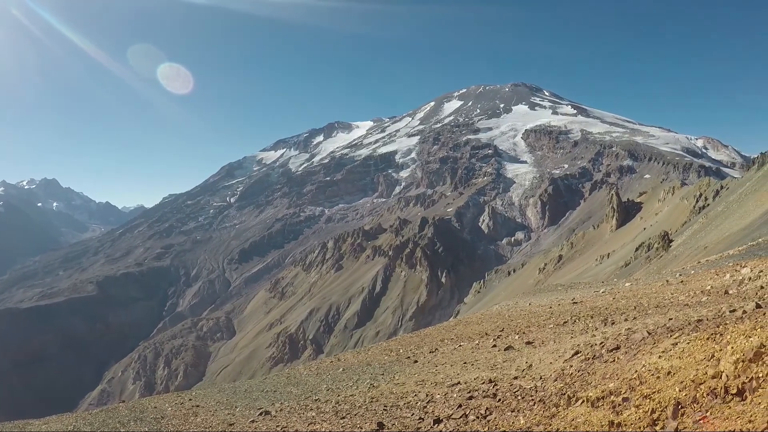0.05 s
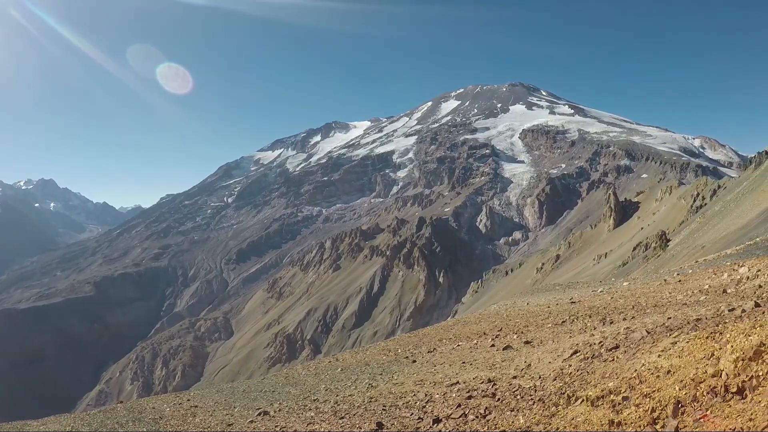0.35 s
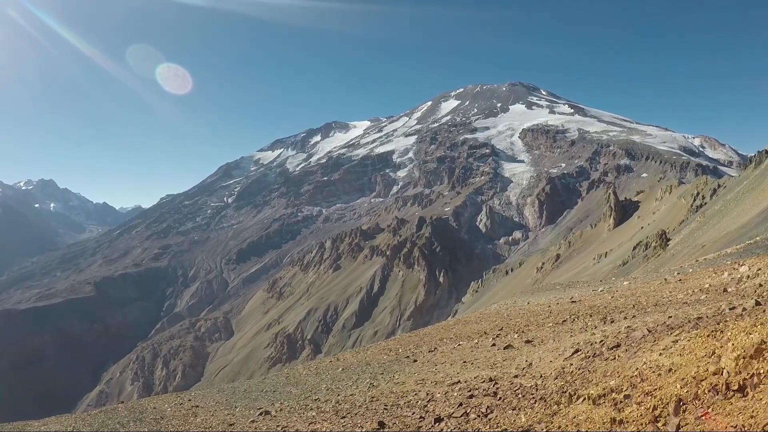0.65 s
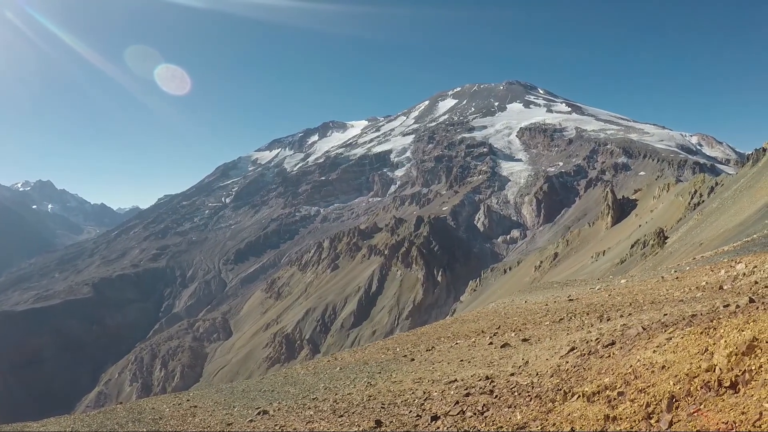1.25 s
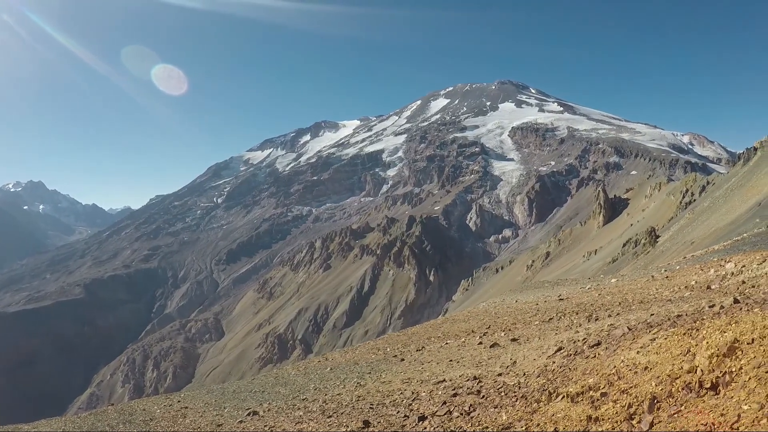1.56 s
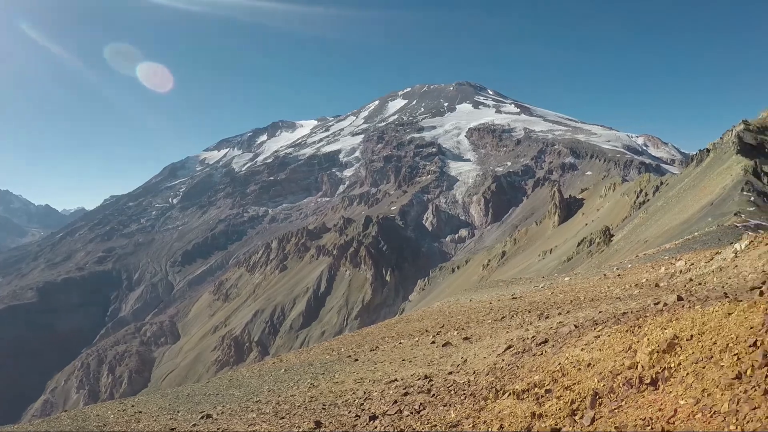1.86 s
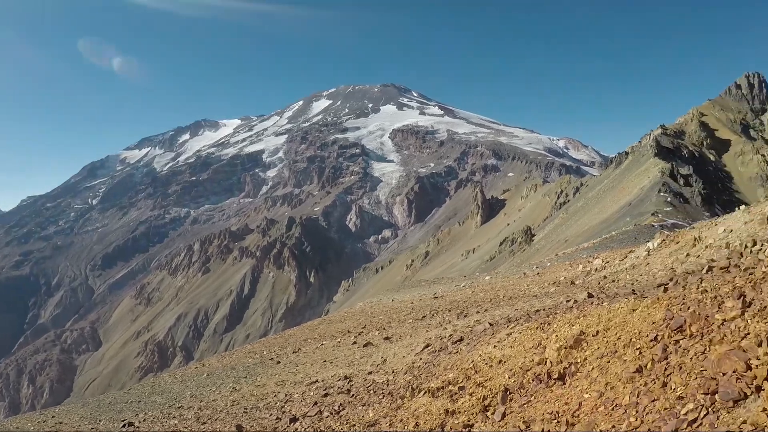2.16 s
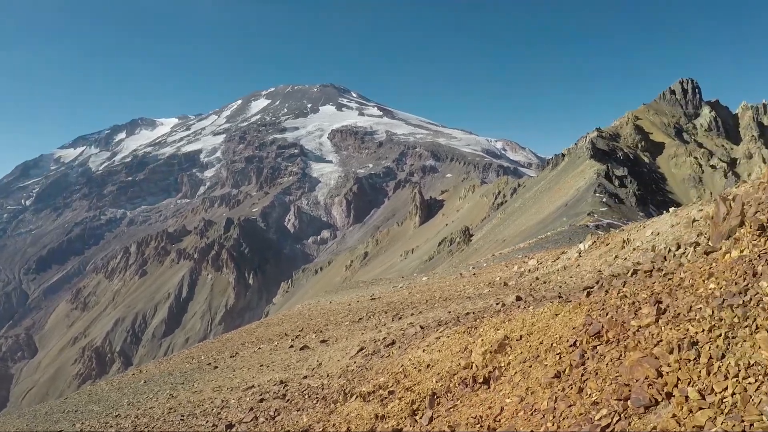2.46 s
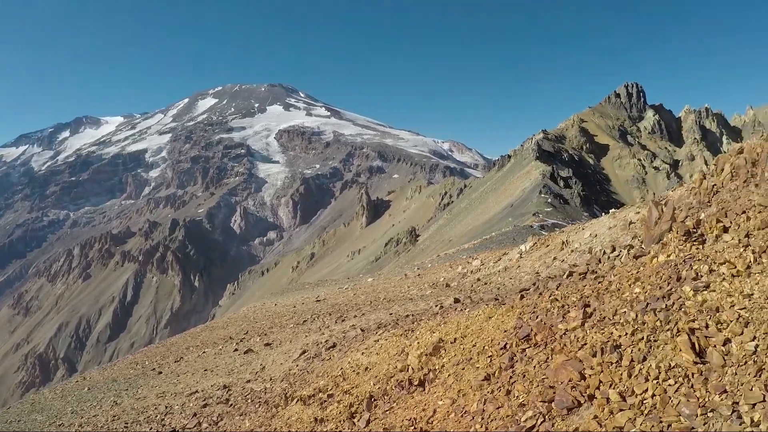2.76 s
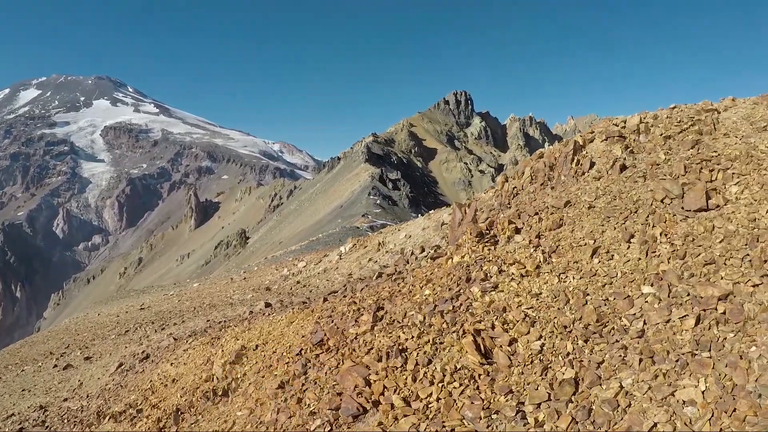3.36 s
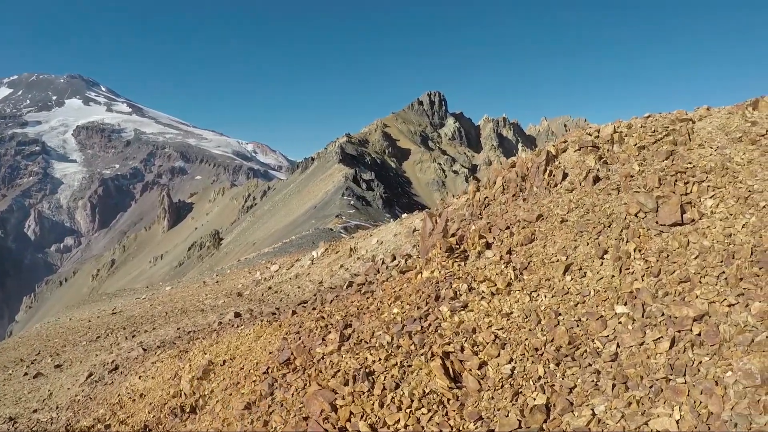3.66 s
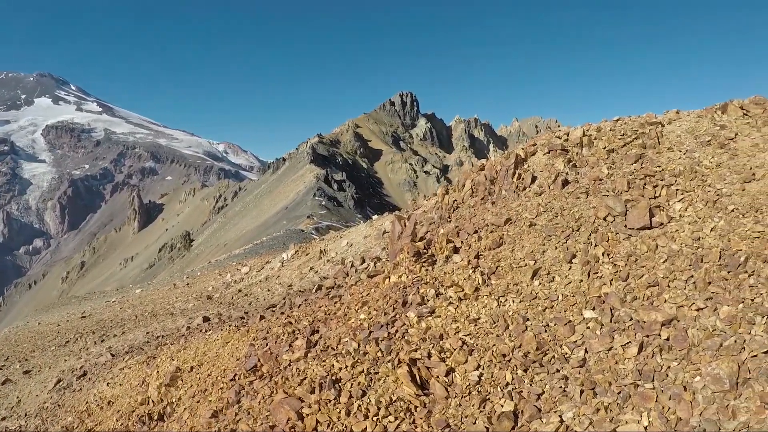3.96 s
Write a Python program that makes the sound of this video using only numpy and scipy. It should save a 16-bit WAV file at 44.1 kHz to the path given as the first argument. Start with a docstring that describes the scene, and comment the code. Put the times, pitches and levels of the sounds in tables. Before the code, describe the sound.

Wind rumbles and buffets against a small microphone on a rocky mountain slope, then eases. A few loose stones click faintly, and near the end a boot shifts with two soft crunches in the gravel.

```python
"""Wind on a scree slope

Wind buffets a small camera's microphone, then eases: eddies at the port rumble and rush.
Loose stones click and ring underfoot; near the end a boot shifts and crunches twice in the gravel,
each push a shower of small contacts. A very faint thin whine and the microphone's hiss lie underneath."""
import sys
import numpy as np
from scipy.fft import rfft, irfft, next_fast_len
from scipy.io import wavfile
from scipy.ndimage import uniform_filter1d, minimum_filter1d, map_coordinates

SR = 44100
rng = np.random.default_rng(int(sys.argv[2]) if len(sys.argv) > 2 else 0)


def wrap_up_sound(samples):
    """Save the sound to the file named by the first command line argument, as 16-bit audio."""
    columns = np.atleast_2d(samples).T
    # keep every value between -1 and 1, then stretch to whole-number steps
    tamed = np.clip(columns, -1, 1)
    steps = np.round(tamed * 32767).astype(np.int16)
    wavfile.write(sys.argv[1], SR, steps)


N = 176400

# Wind spectra, low to high; the port notches the rush (frequency [Hz], relative level [dB])
BUFFET_SPECTRUM = [(8, -8), (22, 3.5), (45, 2), (80, -6.5), (130, -16.5), (550, -120)]
RUMBLE_SPECTRUM = [(40, -14.5), (90, 1.5), (130, 1.5), (200, -3.5), (300, -19), (550, -45), (2000, -120)]
ROAR_SPECTRUM = [(110, -29), (205, 2.5), (350, -6), (480, -22.5), (640, -120)]
RUSH_SPECTRUM = [(300, -1), (480, 5), (560, -7), (660, 0.5), (800, 1.5), (950, -5.5), (1140, -20.5),
                 (1310, -8.5), (1750, -13), (2250, -24.5), (14000, -105)]
# Wind between gusts (time [s], buffet [dB], rumble [dB])
BREEZE_LEVELS = [(0, -20.5, -23.5), (.75, -14.5, -21.5), (1.4, -19, -25.5), (1.72, -26, -24.5),
                 (1.97, -16.5, -30.5), (2.21, -24.5, -38.5), (2.29, -18.5, -30), (2.65, -21.5, -30.5),
                 (2.87, -32.5, -48.5), (3.15, -23, -42.5), (3.32, -32.5, -47.5), (3.7, -21, -34.5),
                 (3.84, -28.5, -49)]
# Gusts at the port (start [s], length [s], buffet [dB], rumble [dB], rush [dB])
GUST_EVENTS = [(0.124, 0.068, -20.5, -17.5, -39.5), (0.186, 0.15, -15, -18, -37.5),
               (0.457, .135, -21, -21, -44), (0.822, 0.081, -16, -20, -51),
               (0.908, .045, -13.5, -13.5, -40.5), (1.089, .17, -25, -22, -50),
               (1.329, 0.071, -21, -21, -45.5), (1.483, 0.099, -12, -20.5, -47),
               (1.493, 0.03, -33, -28, -35.5), (1.768, 0.08, -37, -22.5, -51),
               (1.833, .08, -13, -25.5, -61), (2.04, 0.072, -16, -19.5, -51.5),
               (2.132, 0.036, -10, -26, -51.5), (3.39, 0.091, -14.5, -33.5, -64),
               (3.481, .12, -15.5, -26, -58), (3.865, 0.087, -15.5, -28, -64)]
# Gravel giving way (start [s], level [dB], decay [s], tilt [dB/octave])
CRUNCH_EVENTS = [ (1.512, -55, 0.037, 5), (2.037, -42.5, 0.016, 0.5), (3.126, -46, 0.014, 2),
                 (3.146, -49, 0.038, 4.5), (3.213, -54.5, 0.045, 2), (3.308, -37, 0.011, 0),
                 (3.321, -46.5, 0.03, 3), (3.339, -42.5, 0.028, 3), (3.357, -45.5, 0.012, 2.5),
                 (3.389, -44.5, 0.033, -1.5), (3.731, -52.5, 0.01, 0), (3.827, -54, 0.023, -0.5),
                 (3.953, -42, 0.0086, -2.5)]
# Gravel contacts (frequency [Hz], relative level [dB])
GRAVEL_SPECTRUM = [(450, -9.5), (850, -2.5), (1120, -6), (1520, -1.5), (3300, -5), (5400, -7), (9200, -6.5),
                   (10500, -21.5), (15000, -37)]
# Resonances of the larger stones (frequency [Hz])
STONE_MODES_HZ = [1534, 3200]
# Single stones knocking (start [s], level [dB], ring [Hz], decay [s])
CLICK_EVENTS = [ (0.275, -38.5, 7800, 0.0034), (.292, -49, 8600, 0.011), (1.2763, -35, 6700, 0.0012),
                (1.48, -51, 3550, 0.0075), (2.039, -39.5, 2880, 0.0051), (2.227, -39.5, 2040, 0.0045),
                (3.129, -33.5, 6320, 0.0085), (3.17, -37, 6500, 0.0046), (3.213, -35, 6650, 0.0022),
                (3.224, -36, 6740, 0.0016), (3.3085, -32, 4840, 0.0031), (3.339, -39, 4200, 0.0057),
                (3.372, -35, 7750, 0.00095), (3.415, -37.5, 3140, 0.0028), (3.8525, -42, 2400, 0.004)]
# Whine partials (time [s], fifth [dB], sixth [dB])
WHINE_LEVELS = [(.7, -96, -74), (1.26, -80, -66.5), (1.42, -64.5, -63), (1.54, -82, -74),
                (1.63, -65, -67.5), (2.15, -69, -76), (2.9, -100, -100)]
# Microphone self-noise (frequency [Hz], relative level [dB])
HISS_SPECTRUM = [(1800, 2.5), (3300, 0.5), (4800, -0.5), (9500, -0.5), (12000, -4.5), (15000, -18.5)]

GUST_RISE_S, GUST_FALL_S = 0.014, 0.0066
ROAR_DB, ROAR_EXPONENT = -5.5, 1.24  # re the rumble at its peak; swells faster than the rumble
RUSH_OFFSET_DB, RUSH_DB_PER_DB = -17.5, 1.43  # breeze rush follows the rumble
CRUNCH_RISE_S, GRAINS_PER_S, GRAIN_SPREAD_DB = 0.0006, 500, 3
PEBBLE_GAIN, SAND_GAIN = 0.59, 0.4  # rms re the grains
PEBBLE_HZ, PEBBLE_LOG_SPREAD, PEBBLE_DECAY_CYCLES = 4910, 0.497, 16
STONE_WIDTH_HZ, STONE_RING_DB = 90, 7
CLICK_RISE_S, CLICK_HALF_WIDTH_HZ, CLICK_GRIT_DB = 0.0005, 230, -17
SCUFF_CENTRE_S, SCUFF_HALF_WIDTH_S, SCUFF_DB = 2.442, 0.17, -59
WHINE_HZ, WHINE_DRIFT = 441.5, 0.003
HISS_DB = -62
CEILING_FS, TOP_HZ = 0.64, 15200


def wind():
    """Eddies at the port: buffet, a rumble that brightens as it swells, rush. Gusts rise, hold, fall."""
    t = np.arange(N) / SR
    buffet_db, rumble_db = curves(BREEZE_LEVELS)
    power = amp([buffet_db, rumble_db, RUSH_OFFSET_DB + RUSH_DB_PER_DB * rumble_db]) ** 2
    for start_s, length_s, *levels_db in GUST_EVENTS:
        rise = np.sin(np.pi / 2 * np.clip((t - start_s) / GUST_RISE_S, 0, 1)) ** 2
        fall = np.exp(-np.maximum(t - start_s - length_s, 0) / GUST_FALL_S)
        power += (amp(levels_db)[:, None] * rise * fall) ** 2
    buffet_gain, rumble_gain, rush_gain = np.sqrt(power)
    roar_gain = amp(ROAR_DB) * rumble_gain.max() * (rumble_gain / rumble_gain.max()) ** ROAR_EXPONENT
    swell_db, flutter = 0.7 * wobble(20), wobble(90)
    buffet = buffet_gain * eddies(BUFFET_SPECTRUM, flutter_db=0, samples=2200)
    rumble = rumble_gain * eddies(RUMBLE_SPECTRUM, flutter_db=3.1 * flutter, samples=1500)
    roar = roar_gain * eddies(ROAR_SPECTRUM, flutter_db=4.5 * flutter, samples=1500)
    rush = rush_gain * eddies(RUSH_SPECTRUM, flutter_db=2.9 * flutter + 2 * wobble(260), samples=1100)
    return amp(swell_db) * (buffet + rumble + roar + rush)


def eddies(spectrum, flutter_db, samples):
    """Fluttering turbulence coloured by the port, levelled to rms 1."""
    turbulence = rng.standard_normal(N) * amp(flutter_db)
    return steady(unit(coloured(turbulence, spectrum)), samples)


def crunches():
    """Each push of the boot sets off a dying shower of dry contacts, ringing chips and sand."""
    out, t = np.zeros(N + SR), np.arange(SR // 7) / SR
    for start_s, level_db, decay_s, tilt_db in CRUNCH_EVENTS:
        hits = rng.random(len(t)) < GRAINS_PER_S / SR
        grains = hits * rng.choice([-1, 1], len(t)) * amp(GRAIN_SPREAD_DB * rng.standard_normal(len(t)))
        shower = unit(grains) + PEBBLE_GAIN * pebbles(t, count=40)
        shower += SAND_GAIN * rng.standard_normal(len(t))
        shower = filtered(shower, lambda hz: gravel_response(hz, tilt_db))
        envelope = (1 - np.exp(-t / CRUNCH_RISE_S)) * np.exp(-t / decay_s)
        envelope /= envelope.max()
        out[round(start_s * SR):][:len(t)] += amp(level_db) * steady(shower, samples=700) * envelope
    return out[:N]


def pebbles(t, count):
    """Chips knock at random times, each ringing briefly at its own pitch."""
    start_s = rng.random((count, 1)) * t[-1]
    ring_hz = np.minimum(PEBBLE_HZ * np.exp(PEBBLE_LOG_SPREAD * rng.standard_normal((count, 1))), TOP_HZ)
    gain = amp(GRAIN_SPREAD_DB * rng.standard_normal((count, 1)))
    cycles = np.maximum(t - start_s, 0) * ring_hz
    rings = gain * np.sin(2 * np.pi * cycles) * np.exp(-cycles / PEBBLE_DECAY_CYCLES)
    return unit(rings.sum(axis=0))


def gravel_response(hz, tilt_db):
    """Tilted gravel spectrum; a contact passes straight through and also rings the larger stones."""
    damping = 1j * hz * STONE_WIDTH_HZ
    modes = sum(damping / (mode_hz ** 2 - hz ** 2 + damping) for mode_hz in STONE_MODES_HZ)
    octaves = np.log2(np.clip(hz, 1000, 9000) / 1000)
    return (1 + amp(STONE_RING_DB) * modes) * amp(spectrum_db(GRAVEL_SPECTRUM, hz) + tilt_db * octaves)


def clicks():
    """A small stone rings for milliseconds in one rough resonance, with a little grit."""
    out, t = np.zeros(N + SR), np.arange(SR // 12) / SR
    for start_s, level_db, ring_hz, decay_s in CLICK_EVENTS:
        contact = rng.standard_normal(len(t))
        ring = filtered(contact, lambda hz: 1 / (1 + ((hz - ring_hz) / CLICK_HALF_WIDTH_HZ) ** 2))
        click = steady(ring, samples=100) + amp(CLICK_GRIT_DB) * noise(GRAVEL_SPECTRUM, len(t))
        envelope = (1 - np.exp(-t / CLICK_RISE_S)) ** 2 * np.exp(-t / decay_s)
        envelope /= envelope.max()
        out[round(start_s * SR):][:len(t)] += amp(level_db) / 2 * click * envelope
    return out[:N]


def scuff():
    """Fine grit slides softly, swelling and fading."""
    t = np.arange(N) / SR
    envelope = np.exp(-((t - SCUFF_CENTRE_S) / SCUFF_HALF_WIDTH_S) ** 2)
    return amp(SCUFF_DB) * envelope * noise(GRAVEL_SPECTRUM)


def whine():
    """Thin, slightly unsteady tone; partials 5-7 each come and go."""
    fifth_db, sixth_db = curves(WHINE_LEVELS)
    phase = 2 * np.pi * np.cumsum(WHINE_HZ * (1 + WHINE_DRIFT * wobble(8.9))) / SR
    out = np.zeros(N)
    for partial, level_db in [(5, fifth_db), (6, sixth_db), (7, sixth_db - 8)]:
        flicker = (1 + np.tanh(1 + 2 * wobble(20))) / 2
        out += amp(level_db) * flicker * np.sin(partial * phase)
    return out


def hiss():
    """Steady microphone self-noise."""
    return amp(HISS_DB) * noise(HISS_SPECTRUM)


def limiter(x, samples):
    """Gain ducks smoothly under the strongest buffets."""
    needed = np.minimum(1, CEILING_FS / (np.abs(x) + 1e-9))
    return x * smooth(minimum_filter1d(needed, 2 * samples), samples)


def amp(db):
    """Decibels to gain."""
    return 10 ** (np.asarray(db) / 20)


def unit(x):
    """Scale to rms 1."""
    return x / np.sqrt(np.mean(x ** 2) + 1e-20)


def spectrum_db(spectrum, hz):
    """Level at hz, interpolated on a log axis."""
    knots_hz, levels_db = np.transpose(spectrum)
    return np.interp(np.log(hz + 1), np.log(knots_hz + 1), levels_db)


def curves(rows):
    """Per-sample curve for each column after time."""
    times_s, *columns = np.transpose(rows)
    return [np.interp(np.arange(N) / SR, times_s, column) for column in columns]


def wobble(knots_per_s):
    """Smooth random curve."""
    return map_coordinates(rng.standard_normal(2048), [np.arange(N) * knots_per_s / SR], mode="wrap")


def filtered(x, response):
    """Apply response(hz) by padded FFT."""
    size = next_fast_len(len(x) + 8192)
    return irfft(rfft(x, size) * response(np.fft.rfftfreq(size, 1 / SR)), size)[:len(x)]


def coloured(x, spectrum):
    """Filter by a spectrum table."""
    return filtered(x, lambda hz: amp(spectrum_db(spectrum, hz)))


def noise(spectrum, samples=N):
    """Coloured noise, rms 1."""
    return unit(coloured(rng.standard_normal(samples), spectrum))


def smooth(x, samples):
    """Two-pass moving average."""
    return uniform_filter1d(uniform_filter1d(x, samples), samples)


def steady(x, samples):
    """Divide by running rms to even out slow swells."""
    return x / np.sqrt(np.abs(smooth(x * x, samples)) + 1e-9)


def scene():
    """Wind, stones, whine and hiss; mono."""
    return (wind() + crunches() + clicks() + scuff() + whine() + hiss())[None]


def record(dry):
    """Camera: peak limiter, then steep low-pass."""
    limited = [limiter(x, samples=400) for x in dry]
    return np.array([filtered(x, lambda hz: 1 / (1 + (hz / TOP_HZ) ** 120)) for x in limited])


dry = scene()
out = record(dry)
wrap_up_sound(out)
```